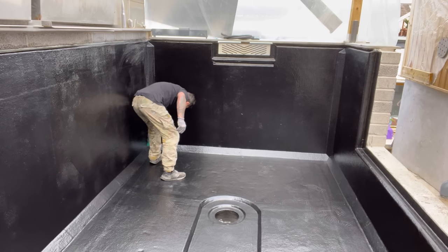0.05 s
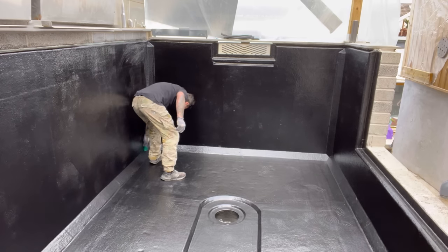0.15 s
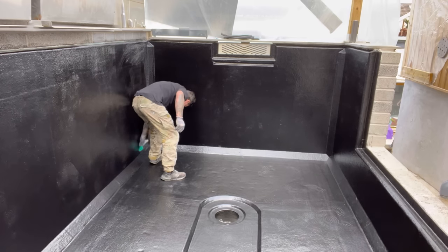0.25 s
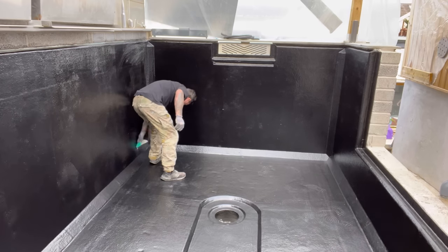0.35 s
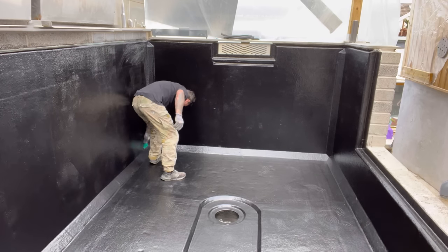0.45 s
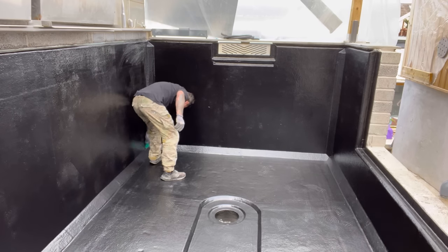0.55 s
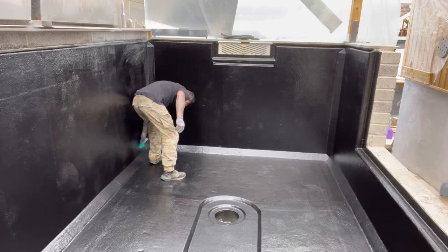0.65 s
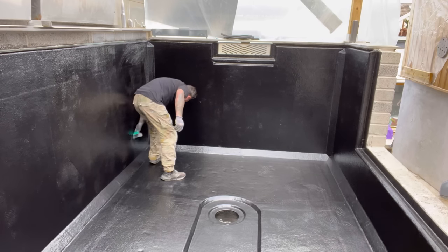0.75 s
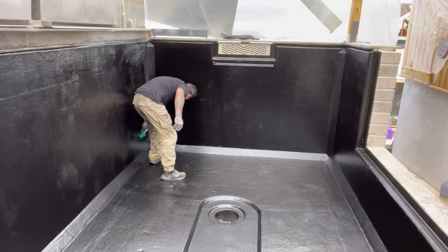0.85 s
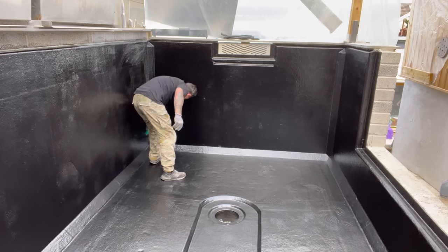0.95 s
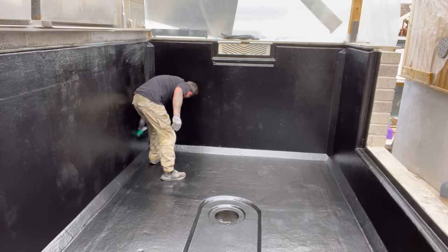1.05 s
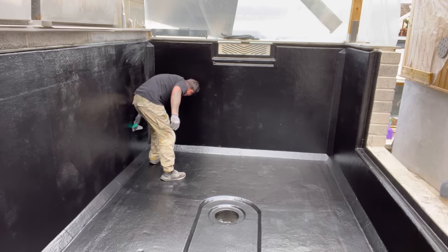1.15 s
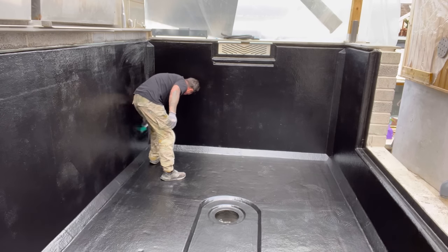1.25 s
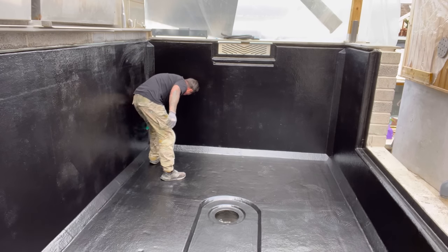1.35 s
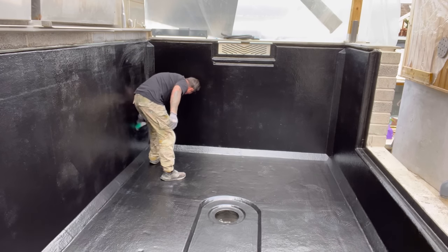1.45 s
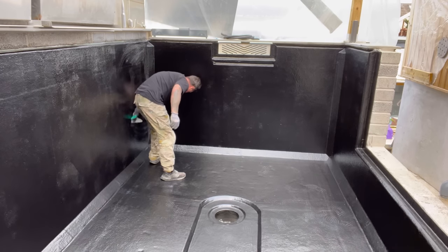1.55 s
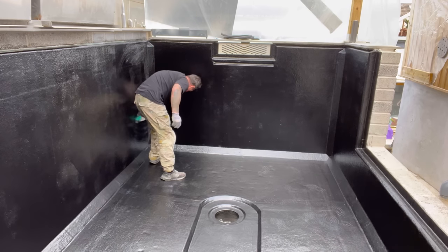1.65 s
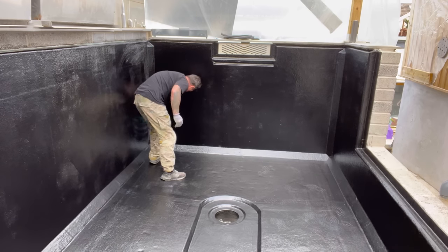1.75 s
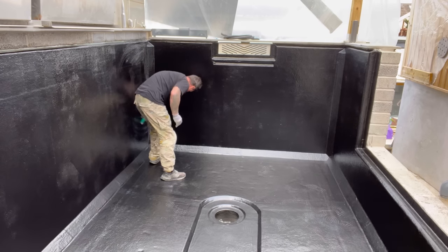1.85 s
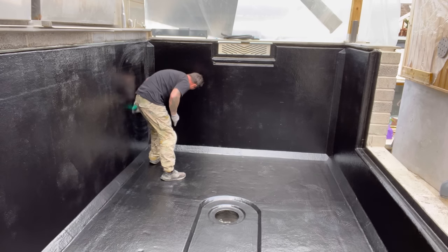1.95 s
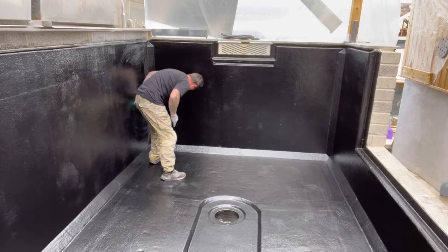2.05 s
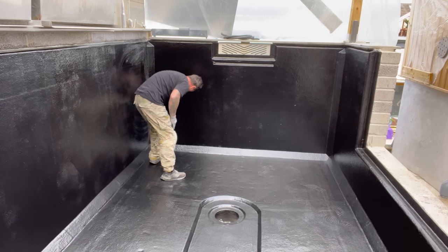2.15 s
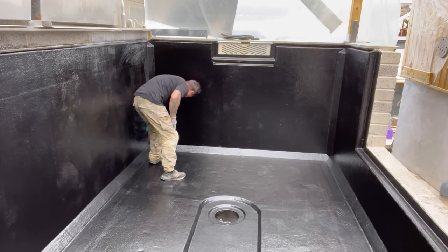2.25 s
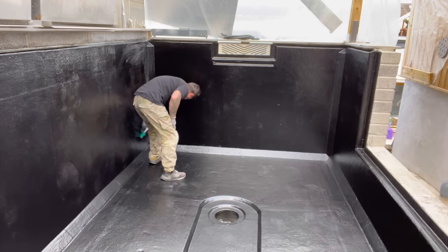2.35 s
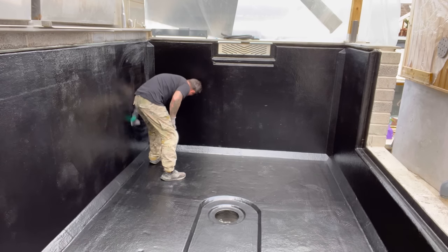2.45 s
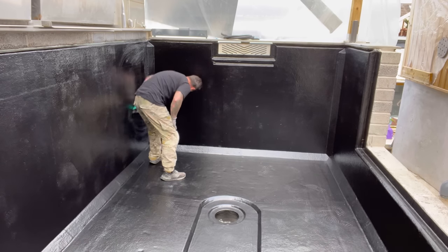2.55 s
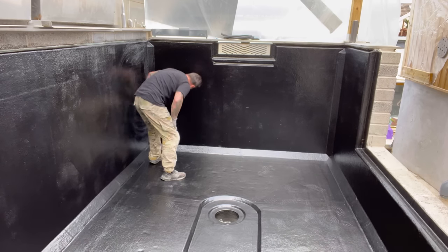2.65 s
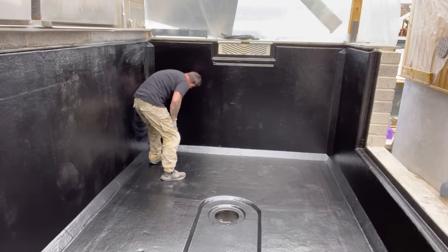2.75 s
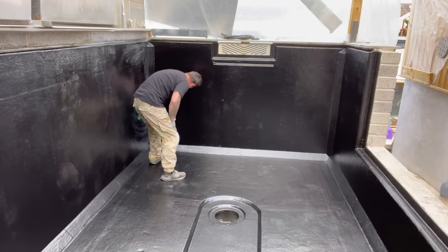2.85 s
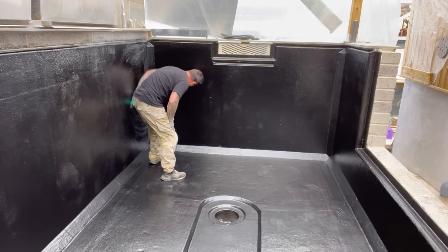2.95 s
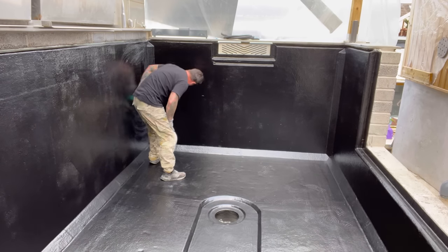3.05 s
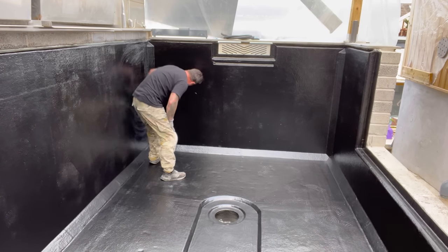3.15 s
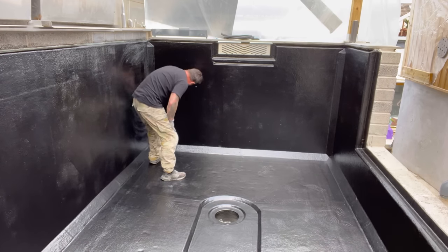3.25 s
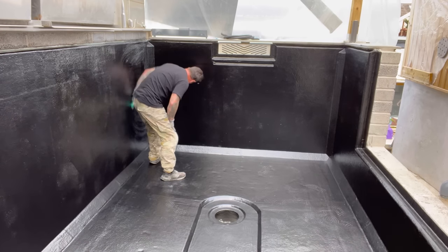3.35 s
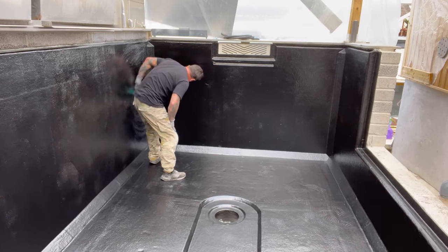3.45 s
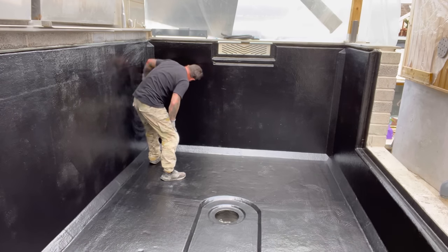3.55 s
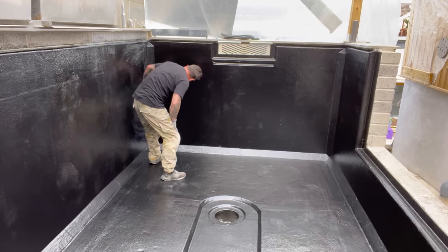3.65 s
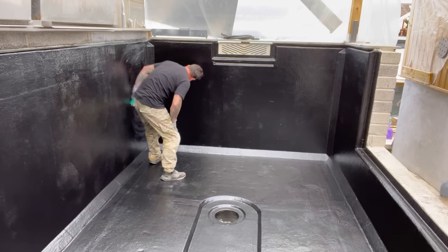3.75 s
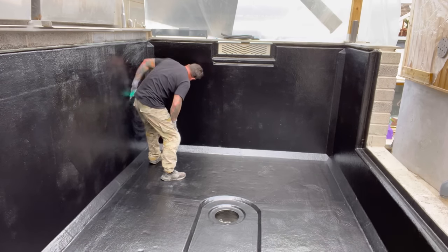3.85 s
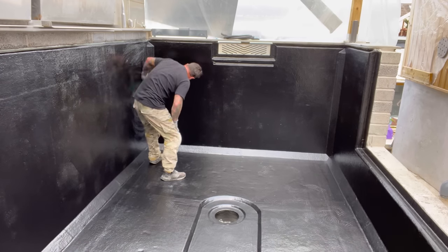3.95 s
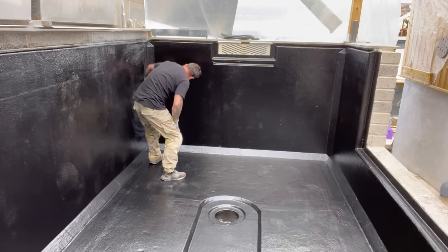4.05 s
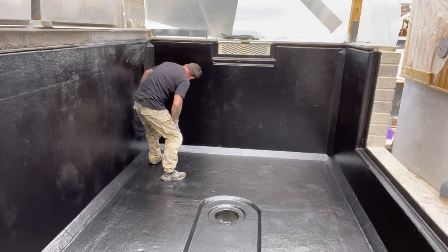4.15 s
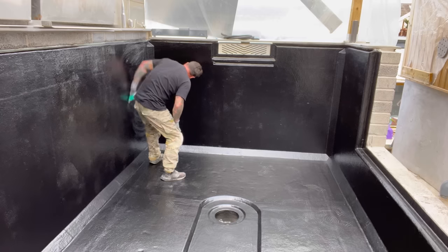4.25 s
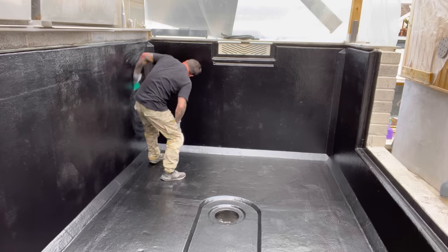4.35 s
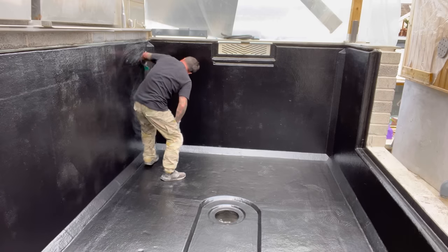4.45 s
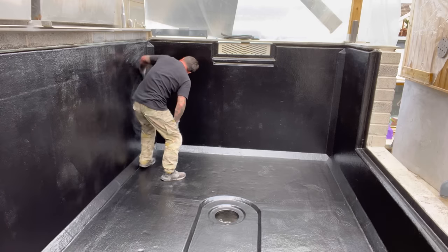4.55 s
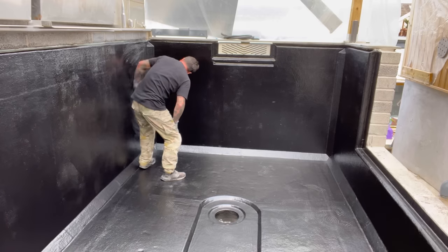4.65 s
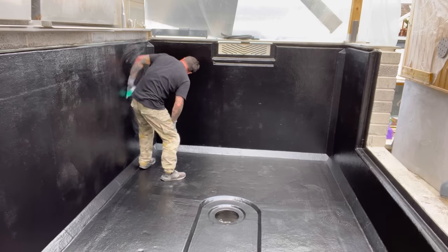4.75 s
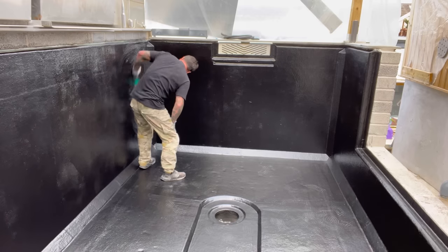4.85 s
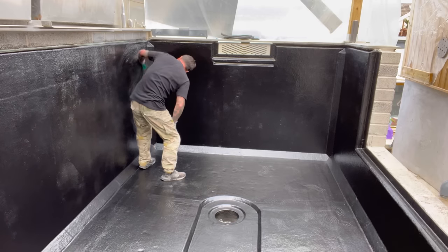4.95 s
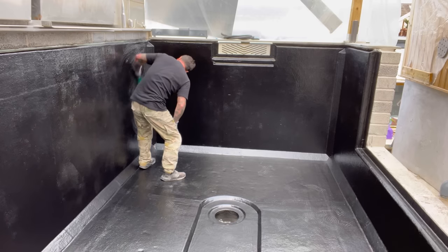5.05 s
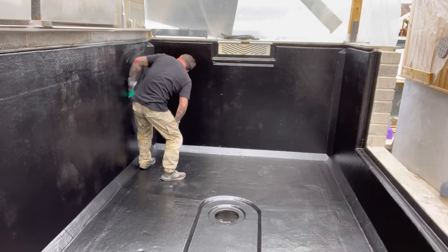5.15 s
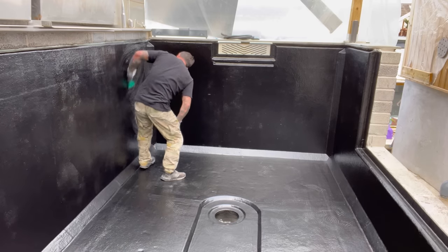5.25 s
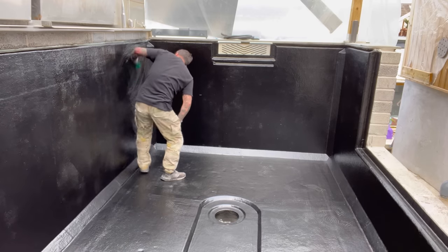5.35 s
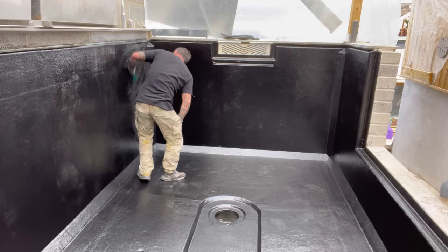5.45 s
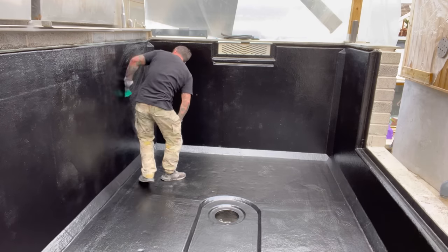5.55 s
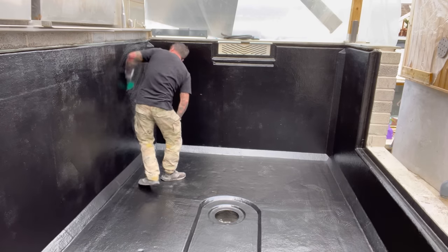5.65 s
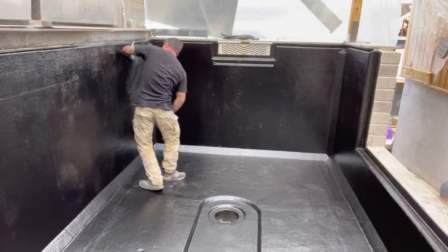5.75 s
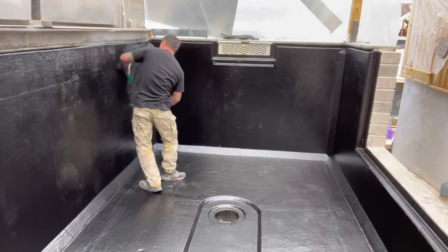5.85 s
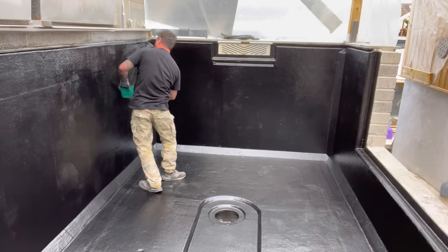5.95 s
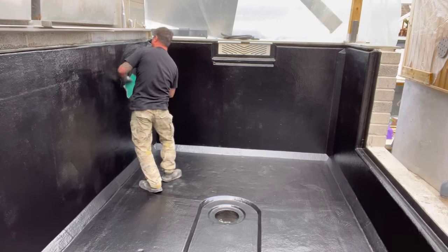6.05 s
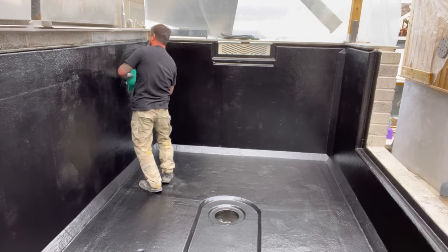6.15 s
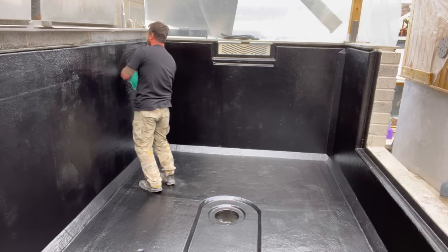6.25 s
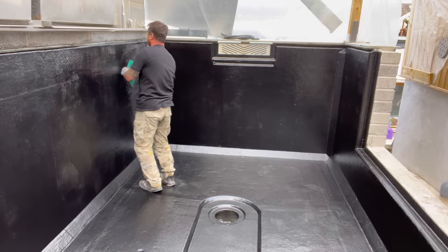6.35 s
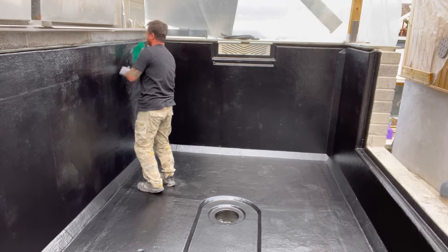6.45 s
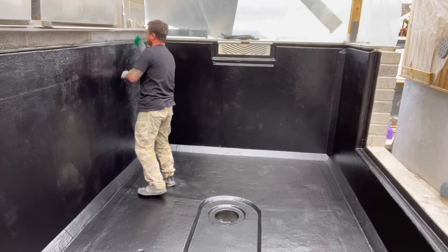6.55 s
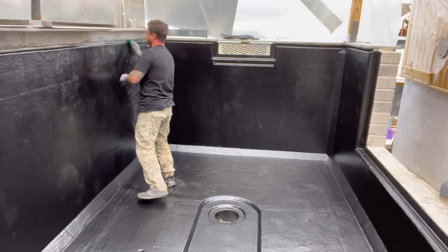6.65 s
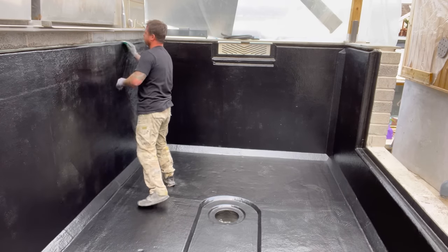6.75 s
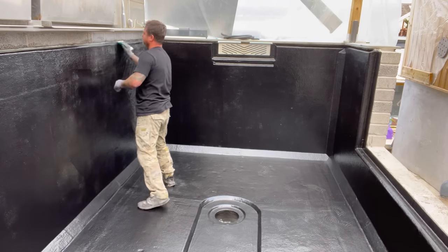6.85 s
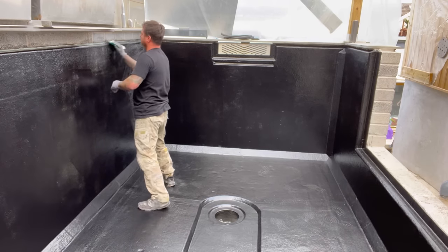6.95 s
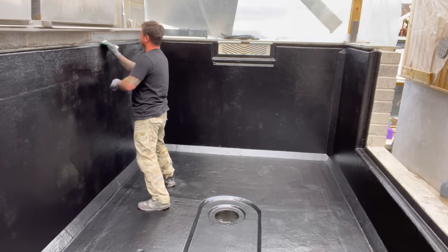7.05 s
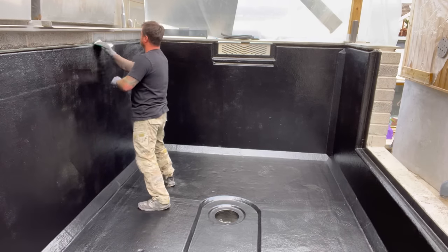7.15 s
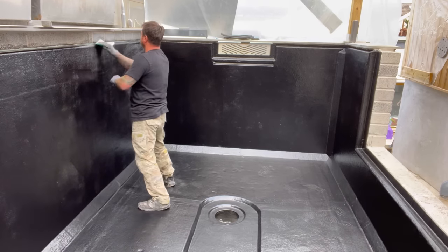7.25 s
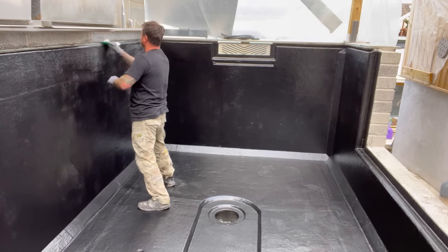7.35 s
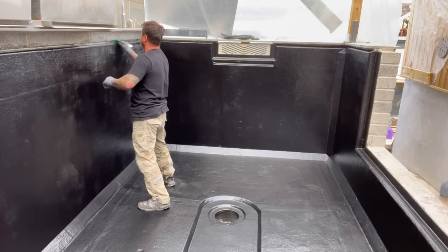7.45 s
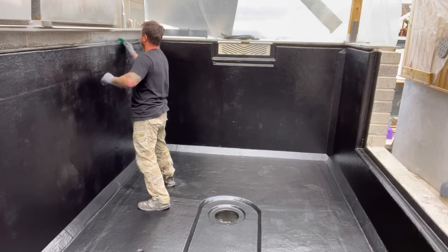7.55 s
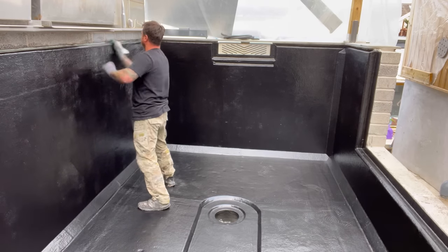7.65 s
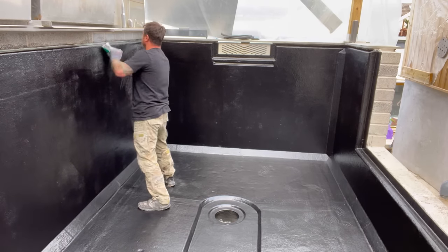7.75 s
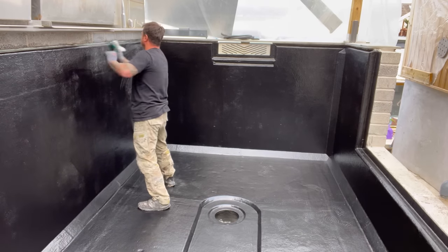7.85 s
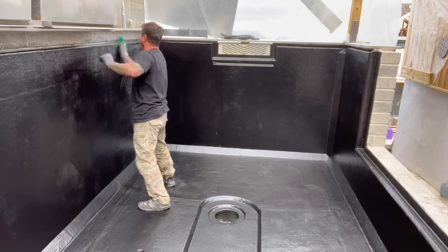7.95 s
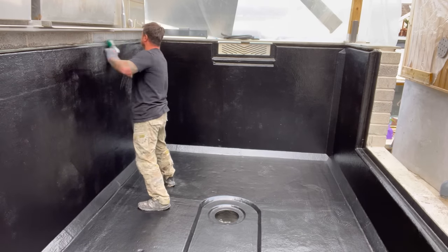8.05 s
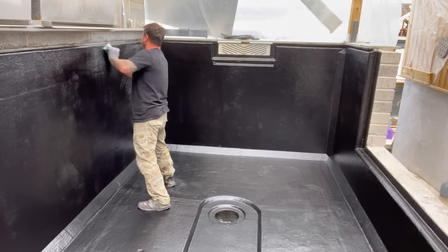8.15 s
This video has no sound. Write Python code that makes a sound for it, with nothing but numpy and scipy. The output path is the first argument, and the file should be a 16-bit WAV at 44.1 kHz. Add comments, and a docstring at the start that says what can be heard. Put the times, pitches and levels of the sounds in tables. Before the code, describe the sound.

A coarse pad scrubs a hard pool wall in quick raspy strokes, pauses, then resumes along the rim with a hollower, ringing scrape.

```python
"""A coarse abrasive pad scrubs the wall of an empty fibreglass pool, about five strokes a second.
Random grain impacts, swelling with each stroke, are shaped into rasp, body and hiss and ring the wall panel.
After a short pause with a soft footfall the pad works along the rim, where the impacts ring hollow; bumps thud.
Decaying noise gives the hard basin's echo; sines make a faint mains hum and shaped noise the outdoor air.
A stereo microphone hears it all, its two sides alike or apart by frequency."""
import sys
import numpy as np
from scipy import signal
from scipy.fft import rfft, irfft, next_fast_len
from scipy.io import wavfile
from scipy.ndimage import uniform_filter1d, map_coordinates

SR = 44100
rng = np.random.default_rng(int(sys.argv[2]) if len(sys.argv) > 2 else 0)


def generate_wav(signal):
    """Clip the signal to [-1, 1] and save it as 16-bit WAV at the path in sys.argv[1]."""
    frames = np.transpose(np.atleast_2d(signal))
    scaled = np.clip(frames, -1, 1) * 32767
    pcm = np.round(scaled).astype(np.int16)
    wavfile.write(sys.argv[1], SR, pcm)


N = 361619

# Hand strokes: peak_s (fastest moment), rise_s, fall_s, rasp_db (before the layer trims), then relative
# to the rasp: pressure_db (body), bite_db (hiss), drum_db (panel), boom_db (deep flexing)
STROKES = [ (0.0, .1, 0.096, -22.5, -7, -9, -17, -29), (0.283, 0.2, 0.076, -25.5, -5, -5, -11, -26),
           (0.457, 0.08, 0.11, -25, -5.5, -7.5, -13.5, -28),
           (0.66, 0.088, 0.12, -23.5, 0.3, -4.5, -17, -29), (0.893, 0.11, 0.07, -19, -10.5, -8.5, -22, -26),
           (1.053, 0.09, .12, -19, -6.5, -6.5, -24, -24), (1.28, 0.097, 0.1, -18, -10.5, -8.5, -23, -30.5),
           (1.468, .1, 0.12, -18.5, -10, -9, -25, -30), (1.675, 0.077, 0.12, -19.5, -14, -7.5, -20.5, -30),
           (1.9, 0.095, 0.12, -20.5, -7.5, -7.5, -23.5, -36),
           (2.09, 0.086, 0.14, -24.5, -9.5, -9.5, -19, -35), (2.27, 0.17, 0.23, -30, -16, -1.5, -20, -22.5),
           (2.43, 0.18, .14, -23, -8, -10, -27, -38), (2.595, 0.07, 0.16, -23.5, -13, -5.5, -21, -31),
           (2.896, 0.12, 0.1, -22, -8.5, -8, -19.5, -34.5), (3.11, 0.12, 0.11, -24, -11, -8.5, -20.5, -32),
           (3.33, 0.11, 0.094, -24, -6, -6.5, -22, -33), (3.548, 0.14, 0.083, -22.5, -15, -9, -26, -36),
           (3.751, 0.11, 0.096, -22, -10, -8.5, -27, -34), (3.942, 0.096, .12, -23, -11, -8, -25, -37.5),
           (4.18, 0.092, 0.11, -22, -10.5, -6, -26, -32), (4.405, 0.17, .12, -25, -9.5, -12, -19.5, -42),
           (4.663, 0.11, 0.098, -21, -13, -8, -23, -37), (4.872, 0.13, 0.11, -24.5, -8, -8.5, -27.5, -39),
           (5.126, 0.11, .097, -23.5, -7, -9, -33, -42), (5.325, 0.089, 0.099, -25.5, -7.5, -6.8, -31, -45),
           (5.513, 0.079, 0.092, -23.5, -8.5, -8, -30, -41),
           (5.715, .11, 0.083, -27.5, -6.5, -3.5, -20, -39), (5.894, 0.11, 0.1, -24.5, -8, -11, -26.5, -39),
           (6.441, .055, 0.077, -56, -3.5, -6.5, -12, -30), (6.825, .12, .07, -45, -1.5, 1.5, -7.5, -26),
           (6.889, 0.023, 0.068, -36, -3.5, 0, -12, -30), (7.1, 0.17, 0.088, -30, 0.2, -3, -15, -27),
           (7.372, 0.12, 0.12, -30, -3, -4, -15.5, -36), (7.475, 0.1, 0.13, -30, -5, -5.5, -11.5, -32),
           (7.695, 0.067, 0.078, -24, -4.5, -7.5, -18, -34), (7.875, 0.093, 0.091, -26, -4.5, -5, -20, -38),
           (8.08, 0.12, 0.062, -26.5, -9, -5, -19, -37), (8.2, 0.063, .1, -24.5, -8.5, -6.4, -22, -34)]
# The pad's place on the rim: time_s, hollow_db (ring over body), edge_db (edge over rasp), ring_hz
RIM_CONTACT = [(5.7, -17.5, -18.5, 1299), (6.62, -11, 0, 1448), (6.78, 0, -20, 1293),
               (6.95, 2.5, -15.5, 1280), (7.1, 2.5, -3, 1431), (7.36, 2, -1, 1626), (7.5, -6, -5.5, 1630),
               (7.7, -3.5, 0, 1350), (7.87, 8, -4, 1233), (8.2, -3, -13.5, 1542)]
# Resonances of the rim's hollow before the ring glides: centre_hz, width_hz, level_db (relative)
RIM_MODES = [(1042, 160, -5.5), (1411, 205, -1.5), (1720, 160, -6)]
# Resonances of the rim's edge: centre_hz, width_hz, level_db (relative)
EDGE_MODES = [(1890, 420, -0.5), (2450, 500, 3.5), (3190, 1300, -6.5)]
# Resonances of the wall panel: centre_hz, width_hz, level_db (relative)
PANEL_MODES = [(197, 28, -7.5), (258, 79, -2), (317, 144, -1.5), (400, 100, -1)]
# Deepest flexing of the wall: centre_hz, width_hz, level_db (relative)
BOOM_MODES = [(86, 18, -5), (111, 14, 0.5), (157.6, 23, 1)]
# Spectrum of the grains' rasp: freq_hz, level_db (relative, per Hz)
RASP_SPECTRUM = [(300, -35), (1000, -7.5), (2000, -3), (3100, 0.5), (4200, -1.5), (5300, -2), (6500, -3.5),
                 (8000, -6.5), (10000, -8.5), (14000, -42)]
# Spectrum of the scrape's lower body: freq_hz, level_db (relative, per Hz)
BODY_SPECTRUM = [(100, -46), (300, -9), (430, -6), (500, -1), (565, -1), (660, -0.5), (765, -0.5),
                 (900, -1.5), (1100, 1), (1600, -4), (2300, -6), (4000, -21), (12000, -51)]
# Spectrum of the grains' hiss: freq_hz, level_db (relative, per Hz)
HISS_SPECTRUM = [(3000, -42), (6500, -3), (8000, 0.5), (9700, -2.5), (11200, -5.5), (12500, -9.5),
                 (13700, -9), (14500, -25.5)]
# trim of each layer, added to its stroke levels, in dB
RASP_DB, BODY_DB, HISS_DB, DRUM_DB, BOOM_DB = 3.5, 2.5, 2.5, -0.5, 0.7


def scrub():
    """Grains catch and slip under the pad; they rasp, hiss, and shake the wall and its rim."""
    *_, rasp_db, pressure_db, bite_db, drum_db, boom_db = np.transpose(STROKES)
    hollow_db, edge_db, ring_hz = curves(RIM_CONTACT)

    # on the rim the scrape gathers into a few resonances, whose pitch follows the place of the pad
    ring = resonate(grit(rate=6000, spread_db=2.5), RIM_MODES)
    ring = glide(ring, ring_hz / RIM_MODES[1][0])
    edge = resonate(grit(rate=12000, spread_db=3.5), EDGE_MODES)

    rasp = patchy(coloured(grit(rate=30000, spread_db=1.66), RASP_SPECTRUM), depth_db=0.82)
    body = patchy(coloured(grit(rate=9000, spread_db=4.0), BODY_SPECTRUM), depth_db=1.2)
    hiss = coloured(grit(rate=32000, spread_db=1.7), HISS_SPECTRUM)
    scrape = swell(rasp_db + RASP_DB) * blend(rasp, edge, edge_db)
    scrape += swell(rasp_db + pressure_db + BODY_DB) * blend(body, ring, hollow_db)
    scrape += swell(rasp_db + bite_db + HISS_DB) * hiss

    drum = resonate(grit(rate=2500, spread_db=0.5), PANEL_MODES)
    boom = resonate(grit(rate=860, spread_db=2.5), BOOM_MODES)
    wall = swell(rasp_db + drum_db + DRUM_DB) * drum
    wall += swell(rasp_db + boom_db + BOOM_DB) * boom

    # the wall gives unevenly, and the pad judders as it drags
    give = amp(1.0 * wobble(rate=18))
    judder = amp(0.5 * wobble(rate=40) + 0.23 * wobble(rate=140))
    return turns() * judder * (scrape + give * wall)


def grit(rate, spread_db):
    """Tiny impacts of abrasive grains, rate a second, of unequal size, scattered anew on each side."""
    hits = rng.random((2, N)) < rate / SR
    pushes = rng.standard_normal((2, N))
    sizes = amp(spread_db * np.clip(rng.standard_normal((2, N)), -2, 2))
    return unit(hits * pushes * sizes)


def patchy(x, depth_db):
    """The colour of the scrape shifts a little as the pad tilts and meets new patches of wall."""
    spectrogram = signal.stft(x, nperseg=512)[2]
    field = rng.standard_normal(spectrogram.shape[1:])
    field = uniform_filter1d(field, size=7, axis=0)  # smooth over frequency
    field = uniform_filter1d(field, size=14, axis=1)  # smooth over time
    shifted = spectrogram * amp(depth_db * unit(field))
    return unit(signal.istft(shifted, nperseg=512)[1][:, :N])


def glide(x, speed):
    """Play x faster or slower, moment by moment, so all its resonances shift by the factor speed."""
    place = np.cumsum(speed) % (N - 1)
    return np.array([map_coordinates(side, [place]) for side in x])


def swell(peaks_db):
    """Each stroke's gain rises as the hand speeds up and falls as it slows, adding in power to the next."""
    t = np.arange(N) / SR
    power = np.zeros(N)
    for (peak_s, rise_s, fall_s, *_), db in zip(STROKES, peaks_db):
        near = np.abs(t - peak_s) < .5
        age = t[near] - peak_s
        width_s = np.where(age < 0, rise_s, fall_s)
        bell = amp(db) * np.exp(-(age / width_s) ** 2)
        power[near] += bell ** 2
    return np.sqrt(power)


TURN_DIP_DB, TURN_S = -1.5, 0.021  # depth and width of the brief dip where the hand turns round


def turns():
    """Gain that dips between strokes, at the point dividing their gap in proportion to fall and rise."""
    peak_s, rise_s, fall_s, *_ = np.transpose(STROKES)
    t = np.arange(N) / SR
    dips = np.zeros(N)
    share = fall_s[:-1] / (fall_s[:-1] + rise_s[1:])
    for turn_s in peak_s[:-1] + np.diff(peak_s) * share:
        near = np.abs(t - turn_s) < .5
        dips[near] += np.exp(-((t[near] - turn_s) / TURN_S) ** 2)
    return amp(TURN_DIP_DB * dips)


# Bumps of the pad, and a soft footfall in the pause (6.225 s):
# start_s, level_db (before onset and decay), thud_db (over the scrape)
BUMPS_AND_FOOTFALL = [(0.675, -32.5, -10), (6.225, -68, 2), (6.412, -47, -8), (6.6, -51, -12),
                      (6.695, -59.5, -22), (7.275, -29, -22), (7.672, -18, -20), (7.85, -22, -27)]


def bumps_and_footfall():
    """A bump or footfall: a short scrape over a dull thud of the panel's resonances."""
    t = np.arange(N) / SR
    scrape = coloured(grit(rate=8700, spread_db=13.5), BODY_SPECTRUM)
    thud = resonate(rng.standard_normal(N), BOOM_MODES + PANEL_MODES)
    out = np.zeros((2, N))
    for start_s, level_db, thud_db in BUMPS_AND_FOOTFALL:
        age = np.maximum(t - start_s, 0)
        onset = 1 - np.exp(-age / 0.0029)
        short_scrape = np.exp(-age / 0.015) * scrape
        dull_thud = amp(thud_db) * np.exp(-age / .05) * thud
        out += amp(level_db) * onset * (short_scrape + dull_thud)
    return out


# Decay of the basin's long tail: freq_hz, t60_s
BASIN_DECAY = [(100, 0.4), (500, 0.72), (2000, 0.83), (5000, 0.69), (9000, 0.51), (14000, 0.26)]
# What the walls throw back: freq_hz, level_db (over the direct sound)
WALL_ECHO = [(100, -4.5), (500, -3), (1200, -3.5), (3000, -5.5), (10000, -12.5)]


def basin(x, walls_t60, tail_db, count=36):
    """Direct sound, wall echoes and a long tail; the echoes change as the hand moves through its places."""
    hop = N // count + 1
    walls, tail = np.zeros((2, 2, N + 2 * SR))
    padded = np.pad(x, ((0, 0), (hop, 2 * hop)))
    fade = np.sin(np.pi * np.arange(2 * hop) / (2 * hop))  # overlapping pieces keep constant power
    walls_decay = lambda hz: np.full(hz.shape, walls_t60)
    tail_decay = lambda hz: along(BASIN_DECAY, hz)
    for k in range(count + 1):
        piece = fade * padded[:, k * hop:(k + 2) * hop]
        for out, t60 in ((walls, walls_decay), (tail, tail_decay)):
            part = signal.fftconvolve(piece, echo(t60), axes=1)
            out[:, k * hop:k * hop + part.shape[1]] += part
    walls_gain = lambda hz: amp(along(WALL_ECHO, hz))
    total = x + filtered(walls[:, hop:hop + N], walls_gain) + amp(tail_db) * tail[:, hop:hop + N]
    # the three paths share the power of the source
    return filtered(total, lambda hz: 1 / np.sqrt(1 + walls_gain(hz) ** 2 + amp(tail_db) ** 2))


def echo(t60):
    """A fresh half-second pair of decaying noises of energy 1; t60 is a function of frequency."""
    noise = rng.standard_normal((2, SR // 2))
    hz, t, spectrogram = signal.stft(noise, SR, nperseg=256)
    decay = np.exp(-np.log(1000) * t / t60(hz)[:, None])
    tail = signal.istft(spectrogram * decay, SR, nperseg=256)[1]
    return tail / np.linalg.norm(tail, axis=1, keepdims=True)


# Mains hum: freq_hz, level_db (rms, before wavering and the stereo image)
HUM = [(50, -64), (100, -79.5), (150, -71.5)]
# Spectrum of the outdoor air: freq_hz, level_db (relative, per Hz)
AIR_SPECTRUM = [(20, -42.5), (36, -16), (50, -3), (62, -1), (80, -10), (160, -3), (300, -6.5), (700, -8),
                (2000, -19), (6000, -21), (14000, -33)]


def background():
    """Soft outdoor air as shaped noise, and a mains hum of sines wavering in level and phase."""
    t = np.arange(N) / SR
    hum = np.zeros(N)
    for hz, db in HUM:
        level = np.sqrt(2) * amp(db + 2.9 * wobble(rate=4.6))
        hum += level * np.sin(2 * np.pi * hz * t + .3 * wobble(rate=5.3))
    return hum + amp(-61) * coloured(rng.standard_normal((2, N)), AIR_SPECTRUM)


# Stereo image: freq_hz, likeness of the sides (0-1), left_lead_rad (phase), left_over_right_db; # from 11 to
# 12.5 kHz the two sides are nearly alike
STEREO_IMAGE = [(60, 0.95, 0.45, -1), (220, 0.86, 0.36, -1.5), (650, .2, 0.9, -0.9), (1300, 0.3, 0.78, -1),
                (2500, 0.09, 1.23, -0.5), (3600, 0.27, 1, -2.5), (5420, 0, 2.2, -5), (7040, 0.6, 3, -2.5),
                (8100, 0.78, 3.5, -1.2), (9500, 0.8, 4.6, -0.6), (10500, 0.78, 5.5, -0.4),
                (11100, 0.97, 6.2, 0), (12500, 0.97, 6.4, 0), (13700, 0.5, 8.6, 0)]


def stereo_image(pair):
    """The two sides share part of the sound, with a level and phase difference between them."""
    def shares(hz):
        angle = np.arccos(np.clip(along(STEREO_IMAGE, hz), -1, 1)) / 2
        return np.array([np.cos(angle), np.sin(angle)])

    def offsets(hz):  # half the level and phase difference goes to each side
        half_level = amp(along(STEREO_IMAGE, hz, axis=3) / 2)
        half = half_level * np.exp(1j * along(STEREO_IMAGE, hz, axis=2) / 2)
        return np.array([half, 1 / half])

    common, apart = filtered(pair, shares)
    return filtered(np.array([common + apart, common - apart]), offsets)


def amp(db):
    """Decibels to gain."""
    return 10 ** (np.asarray(db) / 20)


def unit(x):
    """Scale x to rms 1."""
    return x / np.sqrt(np.mean(x ** 2) + 1e-20)


def along(points, hz, axis=1):
    """One column of a frequency table, read on a log frequency axis."""
    table = np.transpose(points)
    return np.interp(np.log(hz + 1), np.log(table[0] + 1), table[axis])


def curves(rows):
    """One value per sample for each column after the time."""
    s, *cols = np.transpose(rows)
    return [np.interp(np.arange(N) / SR, s, c) for c in cols]


def wobble(rate):
    """A smooth random curve, rate knots a second."""
    knots = rng.standard_normal(N // 20)
    return map_coordinates(knots, [np.arange(N) * rate / SR], mode="wrap")


def filtered(x, response):
    """Multiply the spectrum of x by a complex response of frequency."""
    m = next_fast_len(N + SR // 2)
    return irfft(rfft(x, m) * response(np.fft.rfftfreq(m, 1 / SR)), m)[..., :N]


def coloured(x, spectrum):
    """Shape x by the given spectrum, at rms 1."""
    return unit(filtered(x, lambda hz: amp(along(spectrum, hz))))


def resonate(x, modes):
    """Ring x through a set of resonances of alternating sign, at rms 1."""
    def response(hz):
        total = 0
        for k, (centre, width, db) in enumerate(modes):
            damping = 1j * hz * width
            total = total + (-1) ** k * amp(db) * damping / (centre ** 2 - hz ** 2 + damping)
        return total
    return unit(filtered(x, response))


def blend(a, b, b_db):
    """Mix two sounds at constant power, b lying b_db over a."""
    return (a + amp(b_db) * b) / np.hypot(1, amp(b_db))


def scene():
    """The scrubbing fills the basin and reaches the microphone over the hum and air."""
    in_basin = basin(scrub() + bumps_and_footfall(), walls_t60=0.12, tail_db=-11.0)
    return stereo_image(in_basin + background())


TOP_HZ = 14500  # the recorder's band limit


def record(dry):
    """The recorder rounds off the highest peaks and keeps nothing above its band limit."""
    rounded = dry / (1 + np.abs(dry / .88) ** 8) ** (1 / 8)
    return filtered(rounded, lambda hz: hz < TOP_HZ)


dry = scene()
out = record(dry)
generate_wav(out)
```